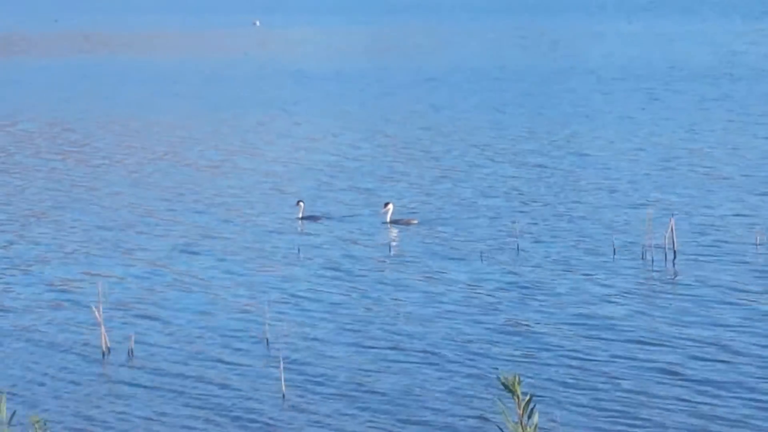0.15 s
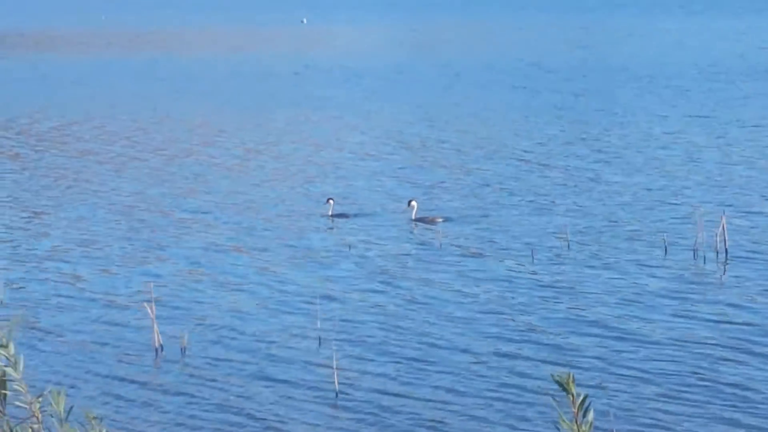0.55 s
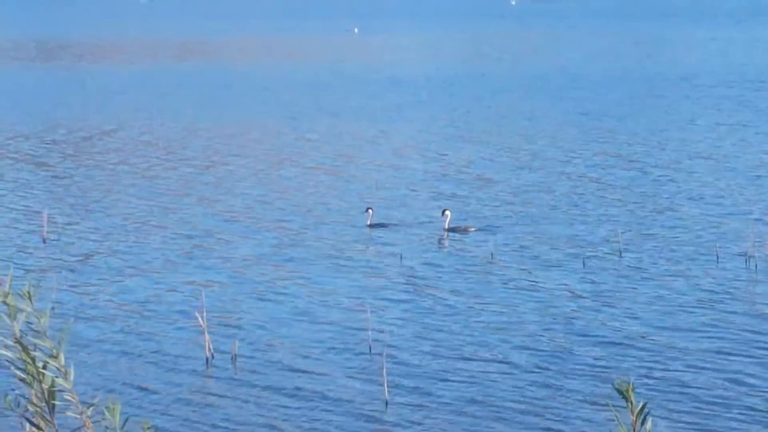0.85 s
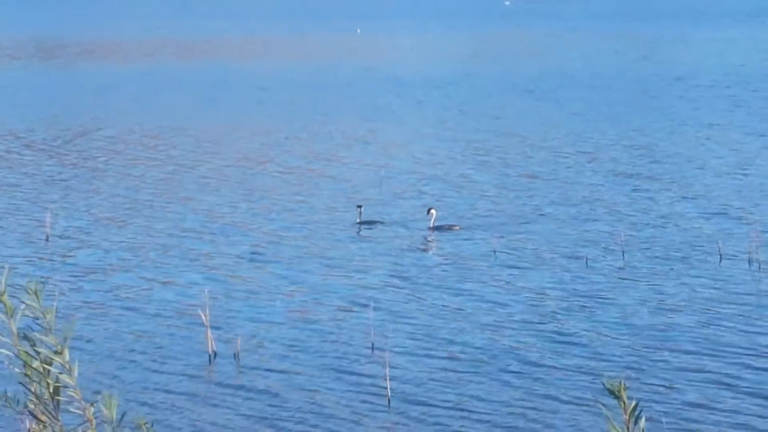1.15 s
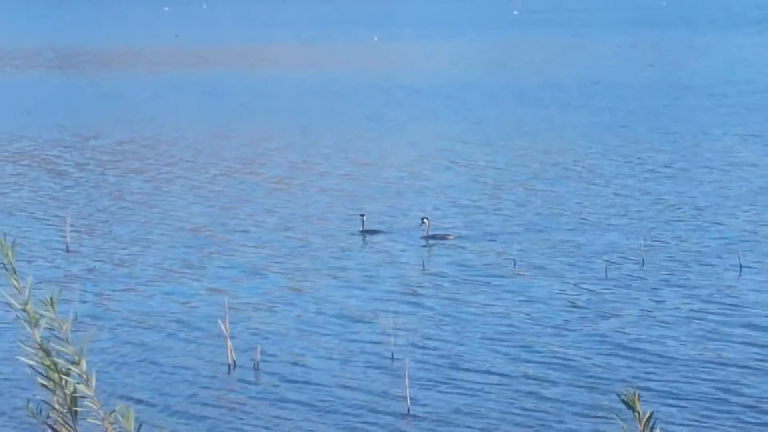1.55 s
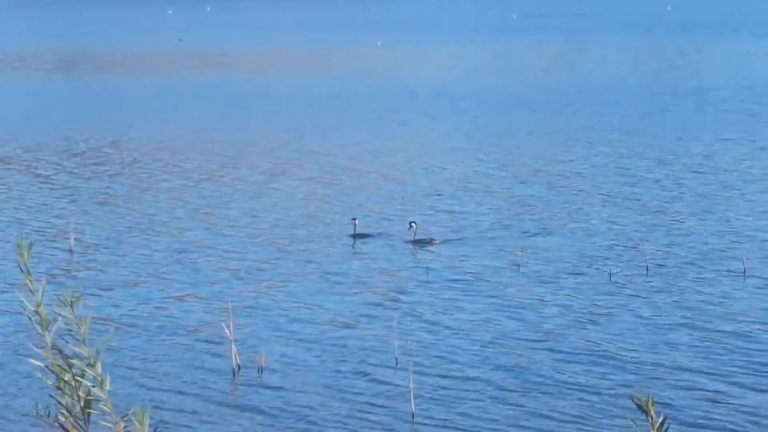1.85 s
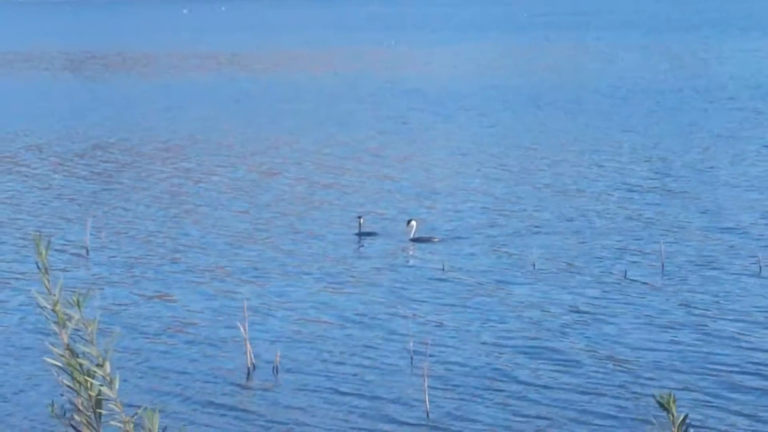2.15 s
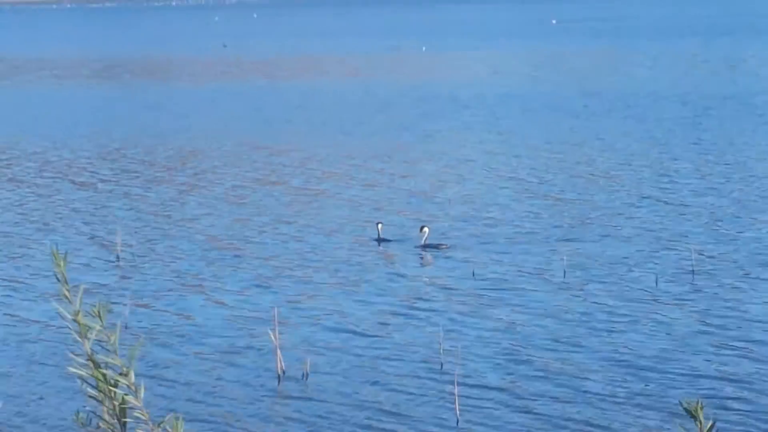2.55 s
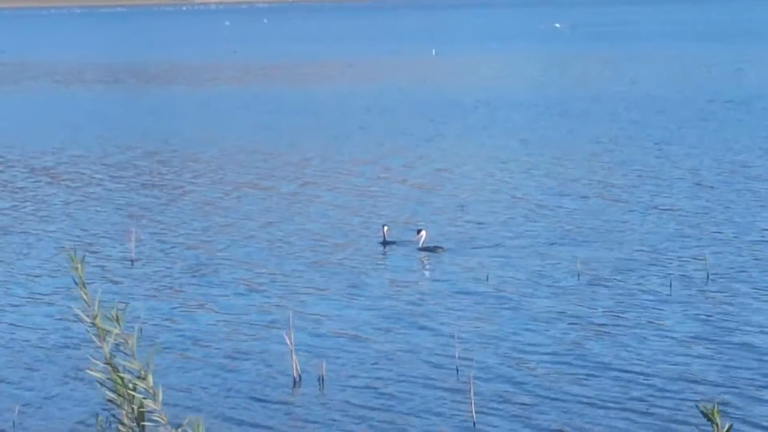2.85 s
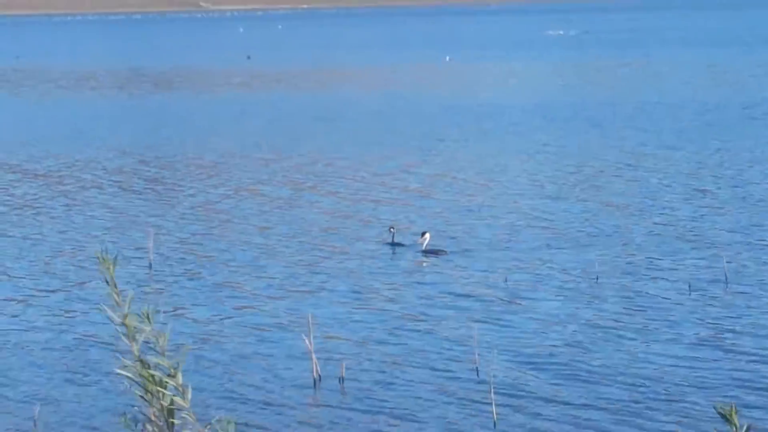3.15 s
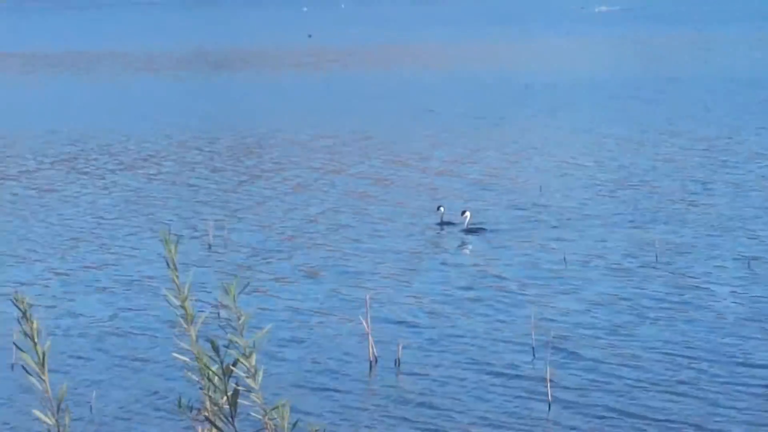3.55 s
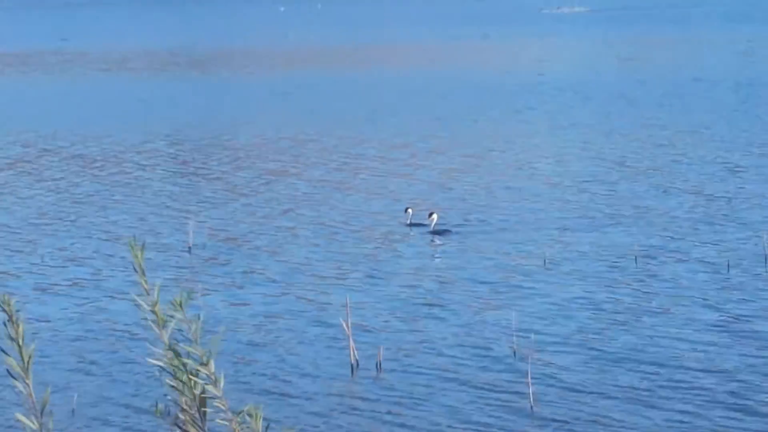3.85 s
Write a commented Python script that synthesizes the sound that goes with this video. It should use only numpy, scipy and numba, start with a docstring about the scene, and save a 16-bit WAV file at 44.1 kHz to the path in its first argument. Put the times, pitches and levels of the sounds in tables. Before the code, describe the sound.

Wind rumble and crackling thumps on a microphone at a lake shore, distant birds trilling behind.

```python
"""Wind buffets two microphone ports on a lake shore from the outset, mostly the left one.
Large eddies roll and rumble as filtered noise; small ones pop as short pressure pulses.
Water birds trill and whistle far out as gliding sines with a diffuse echo; shaped noise hisses faintly.
Late on, a decaying noise burst ticks at the left port; a limiter and a treble cut end the chain."""
import sys
import numpy as np
from scipy import signal
from scipy.fft import rfft, irfft, next_fast_len
from scipy.io import wavfile
from scipy.ndimage import uniform_filter1d, minimum_filter1d
from numba import njit

SR = 44100
rng = np.random.default_rng(int(sys.argv[2]) if len(sys.argv) > 2 else 0)


def materialize(psi):
    """Save the field psi as 16-bit PCM at rate SR to the path in sys.argv[1].

    A 1-D psi becomes a single channel; in a 2-D psi each row is a channel.
    """
    bounded = np.clip(np.atleast_2d(psi).T, -1, 1)
    quanta = np.round(bounded * 32767).astype(np.int16)
    wavfile.write(sys.argv[1], SR, quanta)


N = 176400
ROLL_REF_DB = -18  # large-eddy level about which pitch and sub-rumble vary


def undb(db):
    """Decibel law: amplitude gain grows tenfold per 20 dB."""
    return 10 ** (np.asarray(db) / 20)


def unit(x):
    """Power normalisation: scale to rms 1."""
    return x / np.sqrt(np.mean(x ** 2))


def curve(table, col=1):
    """Linear interpolation: a table column as straight lines in time."""
    table = np.array(table)
    return np.interp(np.arange(N) / SR, table[:, 0], table[:, col])


def shaped(x, gain):
    """Linear filtering: multiply the spectrum by a real gain that is a function of Hz."""
    n = next_fast_len(len(x) + SR // 4)
    spectrum = rfft(x, n) * gain(np.fft.rfftfreq(n, 1 / SR) + 1)
    return irfft(spectrum, n)[:len(x)]


@njit
def svf(x, hz, q):
    """State-variable resonance: a band-pass whose centre moves every sample."""
    y, band_state, low_state, damping = np.empty(len(x)), 0., 0., 1 / q
    for i in range(len(x)):
        g = np.tan(np.pi * hz[i] / SR)
        v = (band_state + g * (x[i] - low_state)) / (1 + g * (g + damping))
        band_state = 2 * v - band_state
        low_state = low_state + 2 * g * v
        y[i] = damping * v
    return y


def walk(rate):
    """Low-pass randomness: held random values, `rate` per second, smoothed twice to spread 1."""
    k = int(SR / rate)
    steps = np.repeat(rng.standard_normal(N // k + 1), k)
    return unit(uniform_filter1d(uniform_filter1d(steps, k), k)[:N])


def band(hz, q):
    """Cascaded resonance: noise through two band-passes, of even level wherever the centre goes."""
    hz = hz * np.ones(N)
    noise = svf(svf(rng.standard_normal(N), hz, q), hz, q)
    return unit(noise / np.sqrt(hz))


def large_eddies(roll, big_db):
    """Large-scale turbulence: slow pressure swings heard as roll, rumble and sub-rumble."""
    rumble_hz, rumble_db = 113.1, -4.5
    sub_hz, sub_db, sub_share = 62.5, -19.5, 0.27  # the sub-rumble follows only a share of the dB swing
    flutter_db, flutter_per_s = 3, 40
    fall_hz = 503  # the spectrum falls as a Gaussian of this scale
    swings = roll + undb(rumble_db) * band(rumble_hz, 1.45)
    big = unit(swings * undb(flutter_db * walk(flutter_per_s))) * undb(big_db)
    sub_level_db = sub_db + ROLL_REF_DB + sub_share * (big_db - ROLL_REF_DB)
    big = big + band(sub_hz, 0.57) * undb(sub_level_db)
    return shaped(big, lambda f: np.exp(-(f / fall_hz) ** 2))


def pop_shape(f, hz):
    """Pulse spectrum: a stretched-exponential fall of scale hz, thinned below 270 Hz."""
    return np.exp(-(f / hz) ** 1.522) * f ** 2 / (f ** 2 + 270 ** 2)


def level_band():
    """Band-limited level: pop levels are reckoned over 500-1600 Hz."""
    f = np.fft.rfftfreq(N, 1 / SR)
    return f, (f > 500) & (f < 1600)


def small_eddies(roll, roll_hz, small_db):
    """Impulsive turbulence: pressure pulses at crests or troughs of the roll, and random strays."""
    strays_per_s, stray_db, stray_oct_per_db = 200, -10.5, -0.23
    spread_db, bunch_db, bunch_per_s, lift_db = 3.5, 3.5, 45, 1.4
    soft_hz, sharp_hz, crisp_hz = 391, 769, 1190  # scales of the spectral fall
    sharp_from_db, crisp_from_db = -20.5, -4.5

    side = np.sign(walk(8))  # pops push at crests for a while, then pull at troughs
    turning = np.diff(np.sign(np.gradient(roll)), prepend=0)
    turns = side * (turning * side < -1)
    # strays thin out in strong wind, to half at most, and multiply in weak wind
    crowd = 2 ** np.maximum(stray_oct_per_db * (small_db - sharp_from_db), -1)
    size_db = spread_db * rng.exponential(size=N) + bunch_db * walk(bunch_per_s)
    stray_here = rng.random(N) < crowd * strays_per_s / SR
    strays = stray_here * rng.choice([-1., 1.], N) * undb(stray_db)

    kicks = (turns + strays) * undb(size_db)
    power_rate = roll_hz + crowd * strays_per_s * undb(2 * stray_db)
    kicks = unit(kicks / np.sqrt(power_rate)) * undb(small_db + lift_db)
    # the sharp share rises with pop size, up to one half
    sharp = 1 / (2 + np.exp(sharp_from_db - small_db - size_db))
    crisp = small_db + size_db > crisp_from_db
    f, counted = level_band()

    def pop(x, hz):
        """Convolution: give each kick the pulse spectrum, at even level in the counted band."""
        return shaped(x, lambda g: pop_shape(g, hz)) / np.sqrt(np.mean(counted * pop_shape(f, hz) ** 2))

    sharp_pops = pop(kicks * sharp * crisp, crisp_hz) + pop(kicks * sharp * ~crisp, sharp_hz)
    return sharp_pops + pop(kicks * (1 - sharp), soft_hz)


def hard_pops(pops, small_db):
    """Single impulses: lone zero-phase pulses, brighter when the small eddies are strong."""
    lift_db, bright_hz, bright_oct_per_db, bright_ref_db = 0.5, 850, 0.075, -20.5
    out, half = np.zeros(N), SR // 50
    f, counted = level_band()
    for (start, peak_db), sign in zip(pops, rng.choice([-1., 1.], len(pops))):
        centre, blow = int(start * SR), np.zeros(2 * half)
        blow[half] = undb(peak_db + lift_db) * sign
        hz = bright_hz * 2 ** (bright_oct_per_db * (small_db[centre] - bright_ref_db))
        pulse = shaped(blow, lambda g: pop_shape(g, hz)) / np.mean(counted * pop_shape(f, hz))
        out[centre - half:centre + half] += pulse
    return out


def wind(table, roll_hz, pops):
    """Turbulent pressure at one port: superposed large eddies, small eddies and hard pops."""
    big_db, small_db = curve(table), curve(table, col=2)
    roll = band(roll_hz * 2 ** (0.13 * walk(12)), 2.14)
    out = large_eddies(roll, big_db) + small_eddies(roll, roll_hz, small_db)
    return out + hard_pops(pops, small_db)


def hiss():
    """Broadband noise of wind in the reeds and on the water, uncorrelated at the two ports."""
    # slow course of the hiss before lift and colour: (time [s], level [dB])
    hiss_level = [(0.0, -70), (0.404, -65.5), (0.723, -69), (1.172, -66.5), (1.402, -63), (1.532, -65.5),
                  (1.98, -64.5), (2.16, -69.5), (2.29, -66), (2.39, -70), (2.554, -69), (2.854, -70.5),
                  (3.657, -65.5), (3.996, -61)]
    # spectral colour of the hiss: (frequency [Hz], gain [dB])
    hiss_colour = [(100, 23), (400, 6.5), (1000, 7), (2000, 3), (3500, -2.5), (6000, -0.5), (9000, -4.5),
                   (14500, -7.5)]
    hz, db = np.array(hiss_colour).T

    def colour(f):
        return undb(np.interp(np.log(f), np.log(hz), db)) * (f > hz[0])

    ports = []
    for _ in range(2):
        noise = shaped(rng.standard_normal(N), colour)
        ports.append(noise * undb(curve(hiss_level) + 6 + 0.59 * walk(7.1)))
    return np.array(ports)


def bird(notes, overtone_db, arch_hz):
    """Frequency modulation: gliding sines with an octave overtone; short or buzzing notes pulse unevenly."""
    edge_s, short_s, single_s = 0.0032, 0.016, 0.0105
    blips_per_s, blip_rise_hz, buzz_gain = 170, 253, 2.2
    out, pace, sizes = np.zeros(N), 2 ** (0.27 * walk(110)), undb(3.6 * walk(150))
    phase = np.zeros(SR)
    for start, length, level_db, early_hz, late_hz, buzz in notes:
        a = int((start - edge_s / 2) * SR)
        t = np.arange(min(int((length + edge_s) * SR), N - a)) / SR
        s = slice(a, a + len(t))
        depth = np.clip(max(buzz_gain * buzz, length < short_s), 0, 1)
        single = length < single_s  # the shortest notes are not split into blips
        blip = t / t[-1] if single else np.cumsum(blips_per_s * pace[s]) / SR % 1
        glide = np.interp(t, [length / 4, length * 0.94], [early_hz, late_hz])
        hz = glide + depth * blip_rise_hz * (blip - .5)
        if arch_hz and early_hz > late_hz:  # an arch instead: quick rise, ever faster fall
            u = 4 * t / length - 1
            hz = early_hz - np.where(u < 0, arch_hz, (early_hz - late_hz) / 9) * u ** 2
        # the phase carries on from near the end of the previous note
        phase = phase[-int(edge_s * SR)] + 2 * np.pi * np.cumsum(hz) / SR
        env = np.clip(np.minimum(t, t[-1] - t) / edge_s, 0, 1)
        if not single:
            pulses = np.sqrt(2) * np.sin(np.pi * blip) * sizes[s]
            env = env * (1 - depth + depth * pulses)
        tone = np.sin(phase) + undb(overtone_db - 3.2 * depth) * np.sin(2 * phase)
        out[s] += undb(level_db) * env * np.sqrt(2) * tone
    return out


def flock():
    """Direct sound and diffuse reflection: all birds, with an echo off reeds and bank unlike at each port."""
    # nearer bird's notes: (start [s], length [s], level [dB], early pitch [Hz], late pitch [Hz], buzz [0-1])
    trill_notes = [(0.026, 0.031, -53, 2530, 2640, 0.05), (0.066, 0.022, -54, 2500, 2498, 0.35),
                   (0.183, 0.021, -52, 2565, 2730, 0.25), (0.247, 0.007, -53.5, 2520, 2668, 0.02),
                   (0.258, 0.0075, -50, 2660, 2630, 0.02), (0.277, 0.047, -51.5, 2600, 2540, 0.38),
                   (0.324, 0.042, -46, 2620, 2530, 0.2), (0.574, 0.0059, -51, 2547, 2550, 0.01),
                   (0.591, 0.016, -54.5, 2551, 2625, 0.12), (0.632, 0.031, -58.5, 2551.0, 2533, 0.5),
                   (0.663, 0.022, -49.5, 2570, 2735, 0.2), (1.156, 0.016, -48.5, 2570, 2623, 0.14),
                   (1.218, 0.012, -46, 2514.0, 2570, 0.02), (1.258, 0.006, -41.5, 2560, 2730, 0.22),
                   (1.291, 0.007, -43.5, 2543, 2700, 0.24), (1.323, 0.008, -45, 2650, 2720, 0.17),
                   (1.351, 0.022, -43, 2570, 2716, 0.45), (1.393, 0.014, -42, 2560, 2650, 0.36),
                   (1.42, 0.045, -47.5, 2500, 2630, 0.08), (1.437, 0.009, -49, 2610, 2830, 0.2),
                   (1.465, 0.043, -46, 2626, 2586, 0.01), (1.616, 0.0076, -48, 2653.0, 2670, 0.05),
                   (1.663, 0.0063, -49, 2700, 2764, 0.02), (1.681, 0.039, -48.5, 2760, 2570, 0.32),
                   (1.732, 0.048, -49.5, 2590, 2670, 0.21), (2.244, 0.063, -51, 2497, 2500, 0.03),
                   (2.299, 0.048, -48.5, 2523, 2502, 0.09), (2.36, 0.033, -57.5, 2500, 2760, 0.3),
                   (2.482, 0.045, -55, 2750, 2595, 0.4), (2.543, 0.046, -55.5, 2544, 2623, 0.3),
                   (2.624, 0.022, -59, 2540.0, 2560, 0.52), (2.709, 0.043, -52.5, 2510, 2503.0, 0.05),
                   (2.758, 0.059, -53, 2480, 2537, 0.13), (2.807, 0.045, -49, 2574, 2630, 0.25),
                   (2.882, 0.017, -53, 2566, 2800, 0.18), (2.961, 0.015, -47.5, 2577, 2660, 0.25),
                   (3.042, 0.0075, -53, 2740, 2734, 0.01), (3.067, 0.028, -52, 2563, 2680, 0.14),
                   (3.11, 0.045, -51.5, 2567, 2620, 0.3), (3.623, 0.014, -55.5, 2550, 2454.0, 0.24),
                   (3.855, 0.02, -56, 2330, 2540, 0.3), (3.893, 0.04, -56.5, 2395, 2500, 0.4),
                   (3.935, 0.033, -59.5, 2470, 2490, 0.3), (3.968, 0.041, -54, 2544, 2460, 0.13)]
    # farther birds' notes, and one high overtone line of a nearer bird: (start [s], length [s], level [dB],
    # early pitch [Hz], late pitch [Hz], buzz [0-1])
    other_notes = [(.213, 0.026, -53.5, 2980, 2776, 0.11), (.313, .045, -53, 3140, 2995, .05),
                   (.308, 0.022, -59, 2207, 2213, 0.22), (.44, 0.05, -66, 2100, 2120, 0.24),
                   (.492, .025, -69, 1936, 2070, 0.087), (.63, .018, -64, 1953, 2184, 0.086),
                   (.374, 0.064, -47.5, 2470, 2446, 0.2), (.427, .05, -56, 2396, 2397, 0.2),
                   (.6, 0.03, -51.5, 2923, 2805, 0.049), (.7, .056, -57.5, 3130, 2800, 0.045),
                   (.72, .02, -60, 2050, 2147, 0.23), (.75, 0.039, -64, 2500, 2532, 0.55),
                   (1.2, 0.0065, -54, 2460, 2695, .2), (1.235, 0.021, -62, 5900, 6080, 0.14),
                   (.803, 0.049, -52, 2477, 2504, 0.044), (.847, 0.035, -54.5, 2503, 2486, .03),
                   (2.17, .04, -62, 2192, 2253, 0.27), (2.495, 0.023, -59, 2342, 2292, 0.41),
                   (2.655, 0.027, -62.5, 2764, 2750, 0.23), (2.672, .022, -55.5, 2335, 2480, 0.32),
                   (2.83, 0.032, -64, 5450, 5530, .05), (2.82, 0.02, -54.5, 2853, 2900, 0.12),
                   (3.19, 0.012, -61, 2537, 2620, .2), (3.225, 0.0079, -56, 2590, 2800, 0.17),
                   (3.512, 0.023, -55.5, 2500, 2700, 0.44), (3.586, 0.009, -58, 2447, 2600, .2),
                   (3.77, .075, -65.5, 2360, 2453, 0.39), (2.545, 0.018, -56, 2210, 2212, .2),
                   (3.805, 0.018, -58, 5680, 5720, 0.096)]
    overtone_db, arch_hz = -13, 200
    chatter_hz, chatter_width_hz, chatter_db = 2690, 290, -76  # width of each of two cascaded resonances
    join_s, join_db = 0.068, -15
    echo_db, echo_t60_s = -14, 0.5
    left_db, right_late_samples = -2, 2

    birds = bird(trill_notes, overtone_db, 0) + bird(other_notes, overtone_db - 13.5, arch_hz)
    # distant chatter swells around the notes
    busy = uniform_filter1d(np.abs(birds), int(join_s * SR)) * undb(join_db + 8.2 * walk(110))
    chatter_level = busy + undb(chatter_db + 2.0 * walk(34))
    birds = birds + chatter_level * band(chatter_hz, chatter_hz / chatter_width_hz)

    t = np.arange(SR // 4) / SR
    tail = rng.standard_normal((2, len(t))) * undb(-60 * t / echo_t60_s)
    tail = tail * undb(echo_db) / np.sqrt(np.sum(tail ** 2, axis=1, keepdims=True))
    echo = signal.fftconvolve(birds[None], tail, axes=1)[:, :N]
    direct = np.array([birds * undb(left_db), np.roll(birds, right_late_samples)])
    return direct + echo


def tick():
    """Exponential decay: a brief bright scratch of band-passed noise."""
    start_s, level_db, centre_hz, decay_s = 3.571, -44.5, 7430, 0.0056
    t = np.arange(N) / SR - start_s
    return undb(level_db) * (t > 0) * np.exp(-np.abs(t) / decay_s) * band(centre_hz, 1.0)


def scene():
    """Superposition: each port has its own wind; birds and hiss lie under it."""
    # left turbulence: (time [s], large-eddy level [dB], small-eddy level [dB], roll pitch before lift [Hz])
    left_wind = [(0.0, -1.5, -19, 204.7), (0.04, -11, -17.5, 211.6), (0.09, -20.5, -29, 185.5),
                 (0.13, -7.5, -18.5, 205.8), (0.254, -15.5, -20, 156.5), (0.299, -8.5, -24, 179.5),
                 (0.354, -30, -42.5, 162.5), (0.389, -16.5, -33, 214), (0.514, -13, -34.5, 148.9),
                 (0.564, -20, -34, 202.8), (0.589, -44, -66.5, 139.5), (0.614, -12, -40.5, 219),
                 (0.678, -11, -24, 153.1), (1.073, -8.5, -21, 241.4), (1.107, -20.5, -41, 207.3),
                 (1.122, -5.5, -18.5, 228), (1.157, -4.5, -18, 195.4), (1.212, -14.5, -27, 201.8),
                 (1.242, -23, -41.5, 153.9), (1.272, -16.5, -50.5, 124.8), (1.307, -13, -23.5, 147.5),
                 (1.342, -27, -36, 189.3), (1.397, -7, -26.5, 176.3), (1.422, -24, -39, 159.2),
                 (1.442, -8, -28.5, 176.1), (1.541, -10, -20.5, 162.8), (1.591, -15, -29, 195.2),
                 (1.661, -14, -25, 230), (1.756, -33, -53, 135.5), (1.816, -33, -58, 160.7),
                 (1.871, -26.5, -47, 143.9), (1.941, -12, -32.5, 183.3), (1.98, -18.5, -43.5, 203),
                 (2.08, -8.5, -18.5, 233.8), (2.11, -27, -50.5, 195.3), (2.14, -4, -13, 198),
                 (2.205, -13, -19, 248.3), (2.325, -9, -50, 143.8), (2.34, -13.5, -37.5, 169.8),
                 (2.42, -13, -12, 237.7), (2.584, -9.5, -29.5, 289.2), (2.629, -15.5, -48.5, 234.3),
                 (2.659, -14.5, -53.5, 210.4), (2.714, -13, -10, 225), (2.824, -15.5, -8, 272.6),
                 (2.944, -19.5, -24, 215.4), (2.955, -31, -54, 186.3), (3.028, -30.5, -62, 121.9),
                 (3.078, -22.5, -53, 159.8), (3.103, -25, -61, 172.8), (3.133, -21.5, -38.5, 170.8),
                 (3.163, -54, -75.5, 113.3), (3.198, -32.5, -71.5, 168.6), (3.253, -29, -52, 174.7),
                 (3.317, -23, -44.5, 157.6), (3.352, -35.5, -62, 155.5), (3.427, -22.5, -48, 157.4),
                 (3.452, -30.5, -57, 193.2), (3.577, -38, -68, 120.4), (3.652, -26, -58, 136),
                 (3.766, -40.5, -58, 104.7), (3.826, -25, -64, 121.5), (3.866, -36, -56.5, 131.2),
                 (3.996, -37, -58.5, 128.4)]
    # right turbulence: (time [s], large-eddy level [dB], small-eddy level [dB])
    right_wind = [(0.0, -48.5, -83.5), (0.075, -23.5, -37.5), (0.155, -33.5, -65), (0.205, -23, -31),
                  (0.249, -41.5, -60.5), (0.374, -39.5, -60), (0.429, -19.5, -47), (0.519, -40.5, -57.5),
                  (0.753, -26, -49), (0.808, -18, -34.5), (0.873, -28, -70), (1.372, -29, -53.5),
                  (1.427, -19, -30), (1.517, -28.5, -61), (1.716, -10.5, -45), (1.761, -35, -55.5),
                  (1.831, -12.5, -49.5), (2.035, -29, -57.5), (2.075, -15.5, -39), (2.12, -32, -57),
                  (2.255, -29, -59), (2.31, -14.5, -26), (2.395, -30, -75), (2.429, -20.5, -41),
                  (2.534, -28.5, -62), (2.584, -26.5, -38.5), (2.614, -30, -67), (2.679, -24, -50),
                  (3.163, -32.5, -68), (3.223, -18, -45), (3.263, -30, -55.5), (3.796, -30, -57.5),
                  (3.821, -13.5, -38), (3.85, -17.5, -68), (3.881, -29, -36), (3.911, -14.5, -54),
                  (3.951, -11, -24), (3.996, -14.5, -56)]
    # single hard pressure pulses at the left port: (time [s], peak before lift [dB])
    left_pops = [(0.035, -2.5), (0.069, -12.5), (0.395, -13.5), (0.471, -13), (0.508, -20), (0.685, -24),
                 (0.728, -13), (0.762, -6), (0.8, -2.5), (0.866, -3.5), (0.94, -4), (0.965, -5),
                 (1.078, -8), (1.128, -15), (1.209, -12), (1.301, -25), (1.401, -26), (1.617, -12.5),
                 (2.08, -15.5), (2.136, -14.5), (2.172, -10.5), (2.197, -3.5), (2.243, -16), (2.347, -17.5),
                 (2.368, -13), (2.391, -12), (2.409, -10), (2.433, -3), (2.471, -7.5), (2.511, -7),
                 (2.583, -16.5), (2.69, -12), (2.934, -32), (3.137, -35)]
    # single hard pressure pulses at the right port: (time [s], peak before lift [dB])
    right_pops = [(0.082, -32), (0.202, -25.5), (0.815, -17.5), (1.421, -25.5), (2.077, -29.5), (2.2, -37),
                  (2.285, -26.5), (2.425, -30), (2.503, -32), (2.578, -34), (3.218, -43), (3.614, -47),
                  (3.823, -30), (3.886, -23), (3.947, -29), (3.96, -18)]
    left_lift, right_roll_hz, roll_oct_per_db = 1.18, 134, 0.06

    # stronger wind sheds eddies faster
    right_octaves = np.clip(roll_oct_per_db * (curve(right_wind) - ROLL_REF_DB), -1, 1)
    right_hz = right_roll_hz * 2 ** right_octaves
    left = wind(left_wind, left_lift * curve(left_wind, col=3), left_pops) + tick()
    right = wind(right_wind, right_hz, right_pops)
    return np.array([left, right]) + flock() + hiss()


def record(dry):
    """Gain reduction and low-pass filtering: a limiter holds each channel's peaks; the top is cut."""
    limit, window_s, top_hz = 1, 0.024, 14550
    size = int(window_s * SR)
    gain = limit / np.maximum(np.abs(dry), limit)
    lowest = minimum_filter1d(gain, size=size, axis=1)
    held = dry * uniform_filter1d(lowest, size=size, axis=1)
    return signal.sosfilt(signal.ellip(10, .2, 80, top_hz, fs=SR, output="sos"), held)


dry = scene()
out = record(dry)
materialize(out)
```